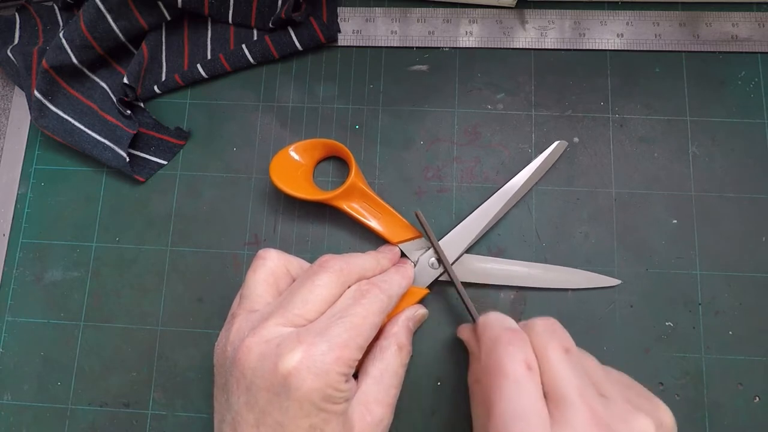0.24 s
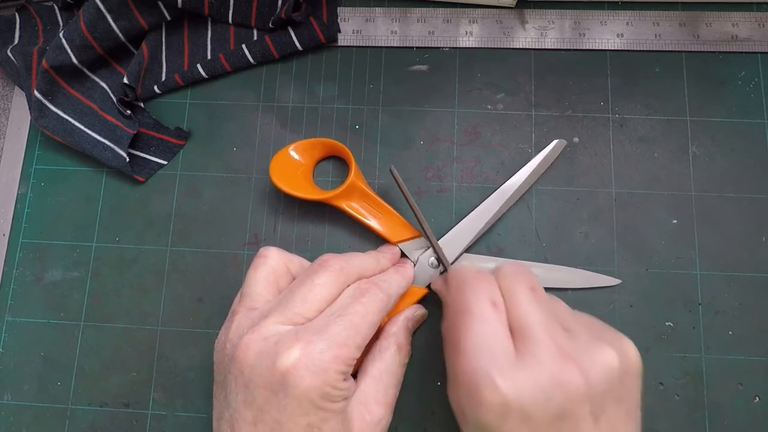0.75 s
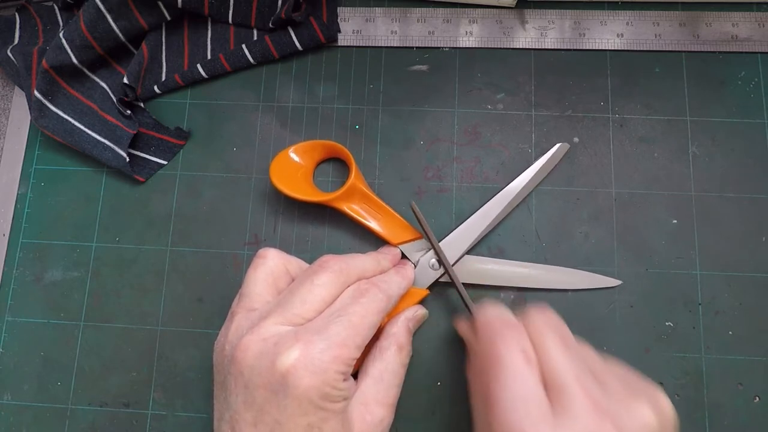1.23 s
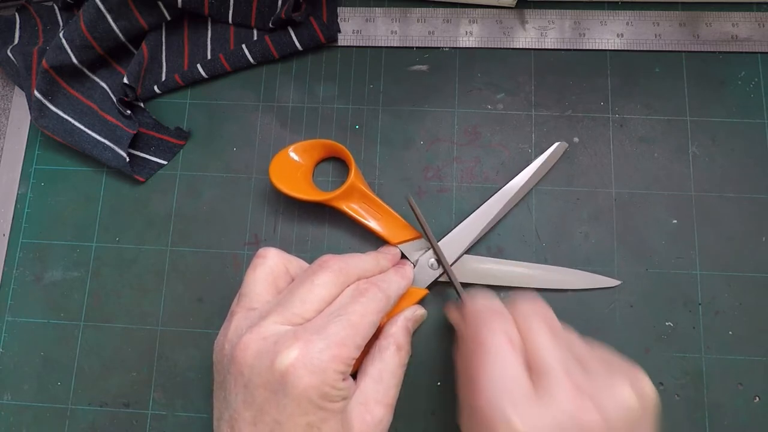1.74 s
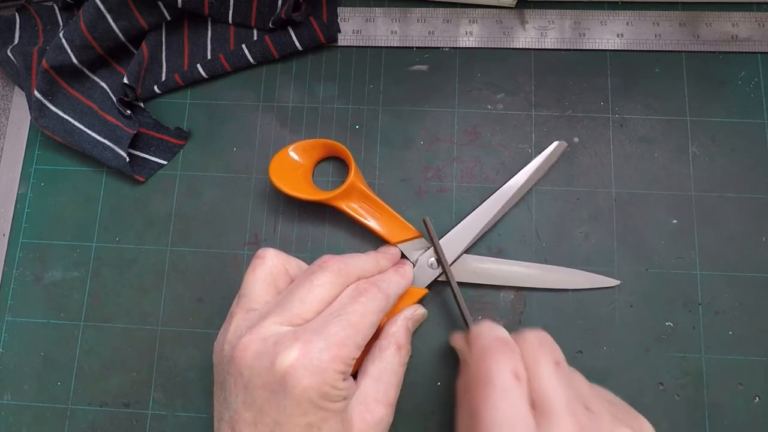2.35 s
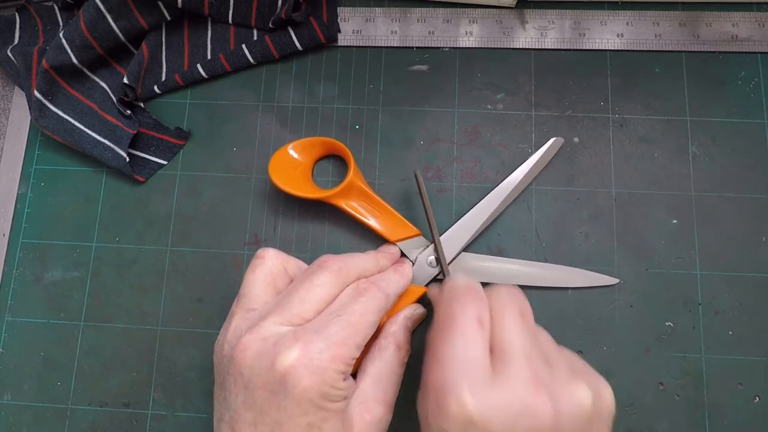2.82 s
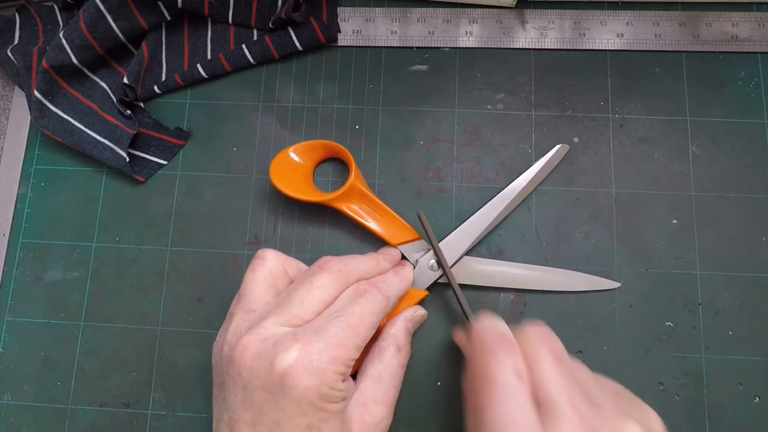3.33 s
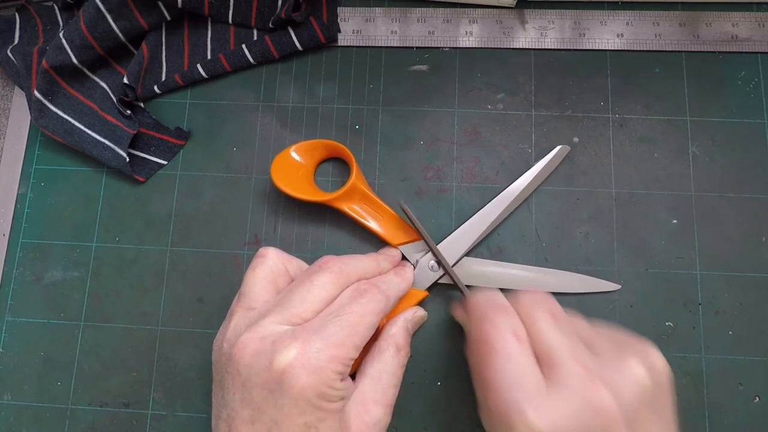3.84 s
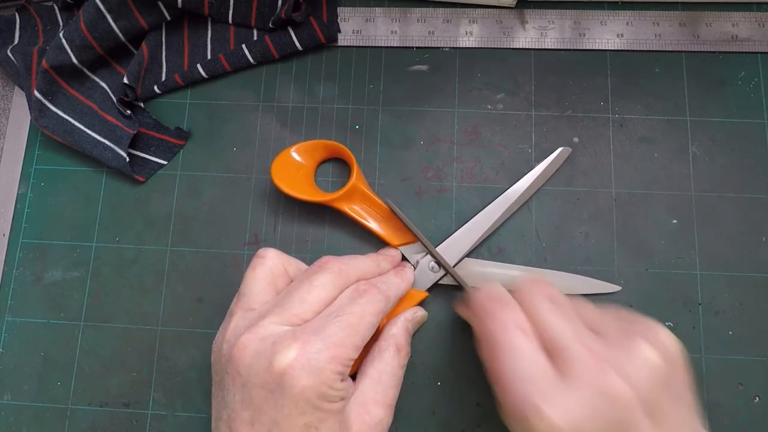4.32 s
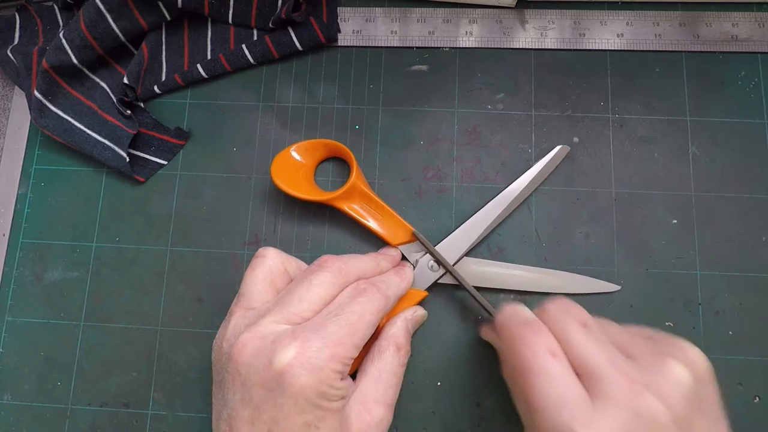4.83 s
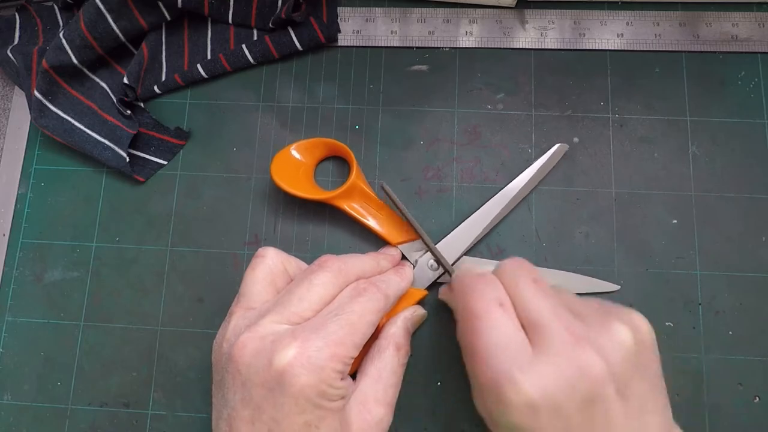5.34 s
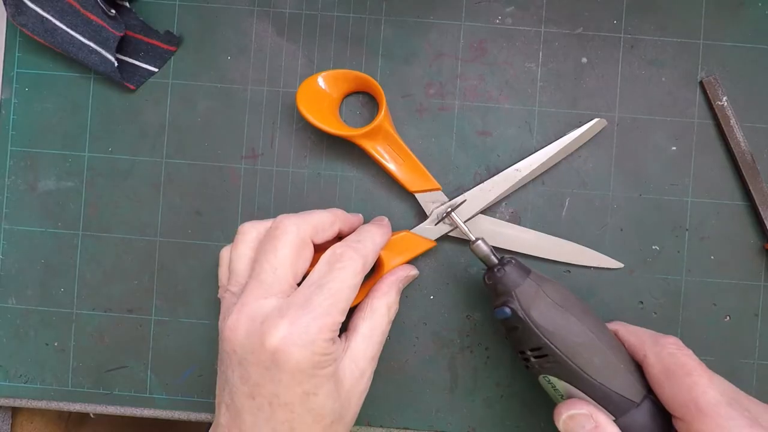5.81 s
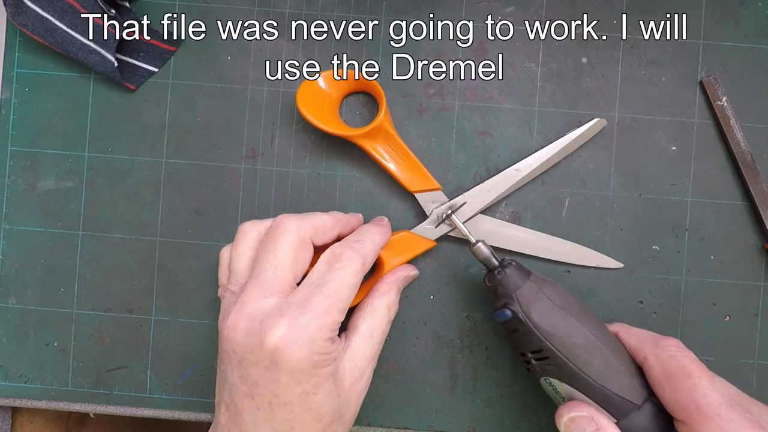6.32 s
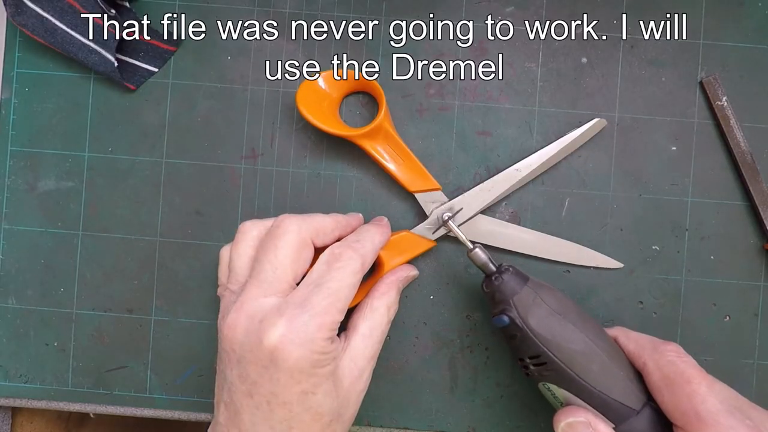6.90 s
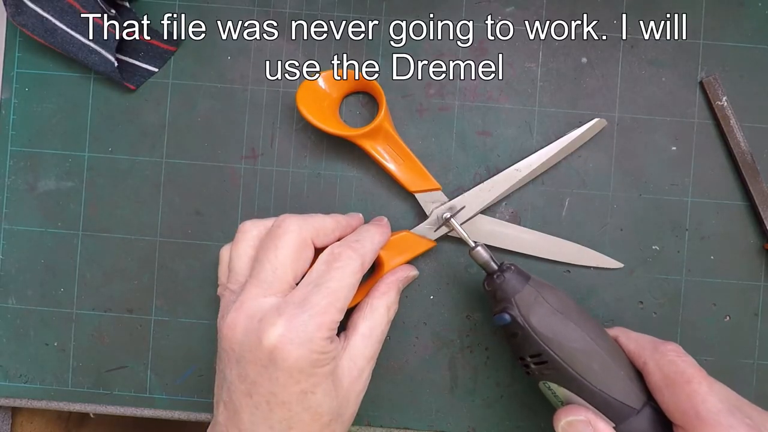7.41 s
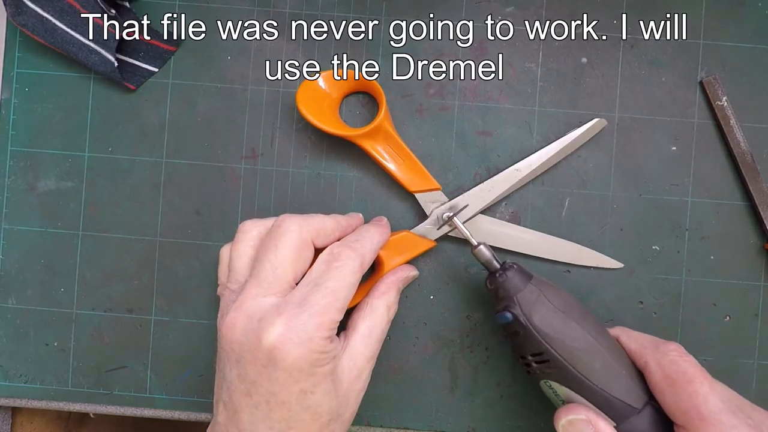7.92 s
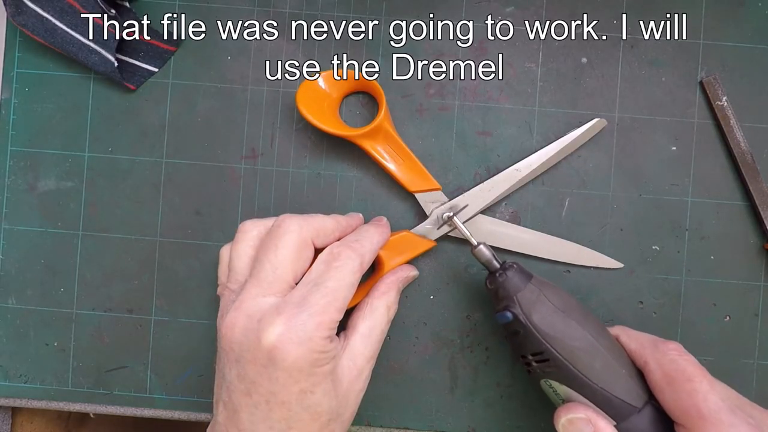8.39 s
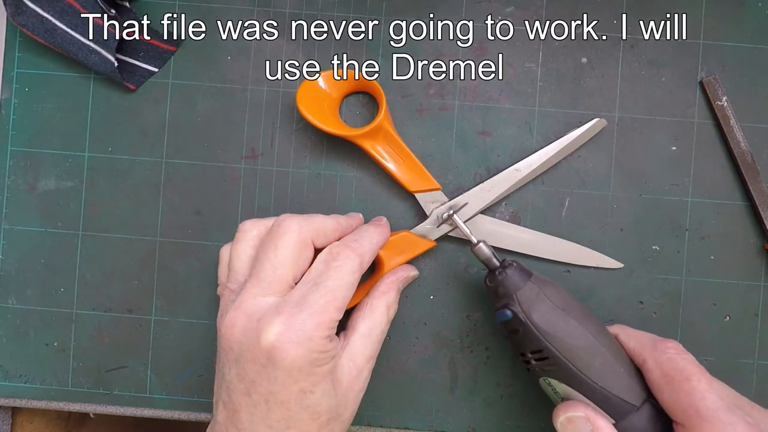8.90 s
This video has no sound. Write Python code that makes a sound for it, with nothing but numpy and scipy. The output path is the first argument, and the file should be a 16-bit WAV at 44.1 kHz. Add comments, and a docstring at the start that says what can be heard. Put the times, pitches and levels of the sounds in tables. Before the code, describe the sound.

Rapid back-and-forth rasping of a file on steel, bright and gritty, each stroke shaking the bench with a dull rumble and occasional clicks. After about five and a half seconds it stops dead and an electric rotary tool is already whirring. The bit bites the metal and grinds continuously, swelling in about four sweeps a second, with brief squeals and a straining motor falling in pitch. Close, wide stereo in a small dry room.

```python
"""Filing and grinding a rivet

A steel rivet in a pair of scissors is worked down on a cutting mat, close to a stereo microphone.
First a hand file rasps in quick strokes: snagging teeth excite the steel's modes and each stroke shakes the bench.
After an abrupt cut and a moment of silence a rotary tool whines under a light touch, then bites into the rivet:
motor tones, fan noise, chatter and squeals all follow one spindle, dragged down in speed as it grinds."""
import sys
import numpy as np
from scipy import signal
from scipy.fft import rfft, irfft, next_fast_len
from scipy.io import wavfile
from scipy.ndimage import uniform_filter1d

SR = 44100
rng = np.random.default_rng(int(sys.argv[2]) if len(sys.argv) > 2 else 0)


def int16_out(signal):
    """Quantize to a 16-bit WAV file."""
    q = np.round(np.clip(np.atleast_2d(signal).T, -1, 1) * 32767)
    wavfile.write(sys.argv[1], SR, q.astype(np.int16))


N = 403496
TIME = np.arange(N) / SR
FILE_ENDS_S, TOOL_BEGINS_S = 5.427, 5.481
MAINS_PULSE_HZ = 100  # half waves of the mains


def from_db(db):
    """Logarithmic level: decibels to amplitude gain."""
    return 10 ** (np.asarray(db) / 20)


def rms_one(x):
    """Normalization: scale to unit power."""
    return x / np.sqrt(np.mean(x ** 2) + 1e-20)


def steady(x):
    """Power levelling: even out the power over 50 ms."""
    return x / np.sqrt(np.abs(uniform_filter1d(x ** 2, SR // 20)) + 1e-20)


def in_time(rows):
    """Linear interpolation: each column of a timed table, sample by sample."""
    s, *columns = np.transpose(rows)
    return [np.interp(TIME, s, column) for column in columns]


def noise():
    """White noise: equal power at all frequencies."""
    return rng.standard_normal(N)


def drift(per_s):
    """Random modulation: a wander of unit rms through per_s random points each second."""
    knots = rng.standard_normal(N // 50)
    return rms_one(np.interp(TIME * per_s, np.arange(len(knots)), knots))


def bump(s, length):
    """Bell-shaped envelope: centred on s and above half its height for the given length."""
    return .5 ** np.minimum((2 * (TIME - s) / length) ** 2, 20)


def colour(x, spectrum):
    """Linear filtering: shape the spectrum by a curve of (f/Hz, gain/dB)."""
    hz, db = np.transpose(spectrum)
    size = next_fast_len(N + SR // 4)
    bins = np.maximum(np.arange(size // 2 + 1) * SR / size, 1)
    gain = from_db(np.interp(np.log(bins), np.log(hz), db))
    return irfft(rfft(x, size) * gain, size)[:N]


def low_part(x, hz):
    """Zero-phase low-pass filtering: what lies below a frequency."""
    return signal.sosfiltfilt(signal.butter(4, hz, fs=SR, output="sos"), x)


def resonate(x, modes, bend=1):
    """Modal synthesis: parallel resonances of alternating sign, all retuned by the factor bend."""
    out = 0
    clock = np.cumsum(bend * np.ones(N)) / SR
    for k, (hz, width, db) in enumerate(modes):
        r = np.exp(-np.pi * width / SR)
        spin = np.exp(2j * np.pi * hz * clock)
        # shift the mode down to 0 Hz, smooth, and shift back
        ringing = (spin * signal.lfilter([1, 1], [1, -r], x * spin.conj())).real
        out = out + (-1) ** k * from_db(db) * (1 - r) * ringing
    return out


def reflections(x, near_t60=0.04, far_t60=0.18, far_db=-8):
    """Reverberation: dense echoes off the bench, then the weaker tail of the workshop; unit power gain."""
    t = TIME[:SR // 3]

    def tail(t60):
        return rms_one(rng.standard_normal(len(t)) * from_db(-60 * t / t60) * (t > .001))

    response = rms_one(tail(near_t60) + from_db(far_db) * tail(far_t60)) / np.sqrt(len(t))
    return signal.fftconvolve(x, response)[:N]


def place(x, width, pan, wet_db, side_db):
    """Mid-side stereo: direct sound with echoes that differ by channel and shift as the hands move."""
    mid = x + from_db(wet_db) * reflections(x)
    hands = drift(12)
    echoes = np.cos(hands) * reflections(x) + np.sin(hands) * reflections(x)
    side = from_db(side_db) * colour(echoes, width)
    left = colour(mid + side, [(hz, db / 2) for hz, db in pan])
    right = colour(mid - side, [(hz, -db / 2) for hz, db in pan])
    return np.array([left, right])


# room tone spectrum: (f/Hz, relative level/dB per Hz)
ROOM_SPECTRUM = [(25, 0), (60, 7), (110, -14), (400, -1), (1500, 2.5), (5000, -20), (9500, -6.5),
                 (11500, -14), (15000, -30)]


def room_tone(level_db=-60):
    """Stationary background: filtered noise."""
    return from_db(level_db) * rms_one(colour(noise(), ROOM_SPECTRUM))


# the teeth catch this quickly, with the hand already this far into its swing
LANDING_S, LANDING_SHARE = 0.008, 0.055
RUN_OUT_S = 0.012  # the file glides on a little after it stops cutting


def stroke(start, length, fastest):
    """Oscillatory motion: speed of the hand through one stroke, 0-1."""
    moments = [start, start + LANDING_S, start + fastest * length, start + length + RUN_OUT_S]
    phase = np.interp(TIME, moments, [0, LANDING_SHARE, .5, 1])
    return np.abs(np.sin(np.pi * phase))


# file strokes, duller and brighter in turn, with one short stray scrape at 2.82 s: (start t/s, length t/s,
# share of the stroke at which the hand is fastest, relative rasp level/dB, relative bench rumble level/dB)
FILE_STROKES = [(-0.011, 0.05, 0.23, -39.5, -34), (0.094, 0.12, 0.48, -38, -36.5),
                (0.262, 0.11, 0.71, -35.5, -35.0), (0.432, 0.12, 0.58, -36.5, -38),
                (0.595, 0.13, 0.76, -37.5, -34.5), (0.77, 0.14, 0.61, -36.5, -40.5),
                (0.951, 0.12, 0.6, -36, -34.5), (1.122, 0.13, 0.62, -36.5, -36.5),
                (1.297, 0.12, 0.66, -36, -36), (1.476, 0.15, 0.24, -37, -37.5),
                (1.667, 0.12, 0.48, -35, -33), (1.831, 0.14, 0.64, -37.0, -37.5),
                (2.007, 0.13, 0.58, -33.5, -33), (2.187, 0.12, 0.63, -33.5, -35),
                (2.348, 0.14, 0.54, -34, -31.5), (2.528, 0.14, 0.49, -35, -37),
                (2.709, 0.12, 0.44, -33, -33.5), (2.823, 0.036, 0.49, -41.5, -36),
                (2.863, 0.13, 0.68, -37.5, -36.5), (3.045, 0.12, 0.59, -34.5, -30.5),
                (3.214, 0.132, 0.58, -35, -35.5), (3.391, 0.13, 0.69, -35.5, -32.5),
                (3.567, 0.136, 0.48, -33.5, -38.5), (3.745, 0.14, 0.58, -35, -32.5),
                (3.925, 0.13, 0.61, -33.5, -38.5), (4.098, 0.13, 0.45, -34, -34),
                (4.275, 0.13, 0.61, -33, -37), (4.448, 0.14, 0.58, -35.5, -36),
                (4.626, 0.14, 0.61, -34, -39), (4.808, 0.15, 0.51, -35.5, -36),
                (5.005, 0.12, 0.51, -35.5, -34), (5.175, 0.14, 0.45, -34.5, -31.5),
                (5.354, 0.084, 0.47, -34, -36)]
# bench top modes: (f/Hz, bandwidth f/Hz, relative level/dB)
BENCH_MODES = [(154.3, 9.1, 2), (194, 25.2, -6.5), (240, 102, -15.5), (296.6, 28, -16), (324.4, 31, -20),
               (429, 40, -27.5), (496, 3.7, -25)]


def bench(rumble_db=-0.5, settle_s=0.012, resting_db=-46):
    """Forced vibration: each stroke shakes the bench top, which settles quickly under the hands."""
    push = sum(from_db(db) * stroke(start, length, fastest)
               for start, length, fastest, _, db in FILE_STROKES)
    r = np.exp(-1 / (settle_s * SR))
    shaking = signal.lfilter([1 - r], [1, -r], push) + from_db(resting_db)
    boom = resonate(noise(), BENCH_MODES, 1 + 0.026 * drift(7.3))
    boom = signal.sosfilt(signal.butter(10, 130, "high", fs=SR, output="sos"), boom)
    return from_db(rumble_db) * shaking * steady(boom)


def snagging_teeth(pace, teeth_per_s_at_half_pace=1100, grain_db=5.5, judder_db=1.22):
    """Impulsive excitation: teeth snag one by one, faster in mid-stroke, amid a steady scraping noise."""
    rate = teeth_per_s_at_half_pace * (.5 + pace) * from_db(drift(150))
    teeth = np.diff(np.floor(np.cumsum(rate) / SR), prepend=0)
    uneven_teeth = rms_one(teeth * from_db(grain_db * noise()))
    snags = rms_one(uneven_teeth + 1.8 * noise())
    return steady(snags * from_db(judder_db * drift(140)))


# file knocking on the rivet: (t/s, relative level/dB)
FILE_KNOCKS = [(0.4393, -22), (1.3324, -19), (1.482, -24), (2.02, -23), (2.1956, -21), (2.3655, -18),
               (2.5325, -26), (2.725, -25), (3.0632, -23), (3.2298, -25), (3.5833, -19), (3.7627, -18),
               (3.934, -22), (4.117, -21), (4.2847, -22), (4.4704, -16), (4.6119, -20), (4.6374, -30),
               (4.826, -24), (5.011, -18.5), (5.0519, -12.5), (5.188, -17), (5.3638, -15)]


def add_knocks(force, knock_db=-10.0, decay_s=0.0013):
    """Impact: add short decaying noise bursts to the force on the steel."""
    burst = np.exp(-np.arange(SR // 40) / SR / decay_s)
    for s, db in FILE_KNOCKS:
        knock = from_db(db + knock_db) * burst * rng.standard_normal(len(burst))
        force[round(s * SR):][:len(burst)] += knock
    return force


# modes of the scissors and file: (f/Hz, bandwidth f/Hz, relative level/dB)
STEEL_MODES = [(517, 8.7, 6), (611.2, 12.5, 13.5), (772, 15.6, 2.5), (918, 48, 11), (1309, 15, 9),
               (1718, 77, 9), (2360, 147, 6.5), (3000, 28, 11.5), (3844, 270, 8.5), (4390, 213, 10),
               (5940, 800, -17), (6260, 200, 14), (7530, 360, 6)]
# scraping spectrum: (f/Hz, relative level/dB per Hz)
RASP_SPECTRUM = [(200, 2.5), (450, 1), (750, -0.5), (1400, 6.5), (3000, 5), (4000, 8), (4800, 6),
                 (6300, 17.5), (7600, -10), (8400, -2.5), (9400, -0.5), (11200, -19), (13000, -23),
                 (15000, -33)]


def ringing_steel(force, ring_db=-1.0, scrape_db=-2.0, shift_db=1.8, grip_bend=.013):
    """Modal response: the force rings the steel, whose pitch shifts with the grip, and scrapes it."""
    bend = 1 + grip_bend * drift(12)
    ring = 0
    for k, mode in enumerate(STEEL_MODES):
        # as the contact travels along the file, each mode is fed more or less
        feed = force * from_db(shift_db * drift(16))
        ring = ring + (-1) ** k * resonate(feed, [mode], bend)
    ring = from_db(ring_db) * rms_one(low_part(ring, 8200))
    scrape = from_db(scrape_db) * rms_one(colour(force, RASP_SPECTRUM))
    return np.std(force) * (ring + scrape)


# file squeaking as it turns round: (t/s, length t/s, f/Hz, relative level/dB)
FILE_SQUEAKS = [(1.121, 0.03, 4450, -50), (1.294, 0.017, 4650, -50)]


def squeaks(width_hz=190):
    """Narrow-band resonance: noise through one mode gives each short squeak."""
    out = np.zeros(N)
    for s, length, hz, db in FILE_SQUEAKS:
        out += from_db(db) * bump(s, length) * rms_one(resonate(noise(), [(hz, width_hz, 0)]))
    return out


ALTERNATE_BRIGHTER_DB = 0.5  # treble against middle range, every second row compared with the others
TREBLE_RISE_DB_PER_S = 1  # the highest treble grows as the work goes on


def hand_file(resting_scrape_db=-55.5):
    """Source-filter principle: teeth snag faster and harder in mid-stroke and ring the steel."""
    pace, rasp, keen_db = np.zeros((3, N))
    for k, (start, length, fastest, rasp_db, _) in enumerate(FILE_STROKES):
        swing = stroke(start, length, fastest)
        pace += swing
        rasp += from_db(rasp_db) * swing ** 1.02
        keen_db += swing * ALTERNATE_BRIGHTER_DB * (k % 2 - .5)
    # a faint steady scrape goes on under and between the strokes
    force = snagging_teeth(pace) * (rasp + from_db(resting_scrape_db))
    steel = ringing_steel(add_knocks(force)) + squeaks()
    body = low_part(steel, 10500)
    steel = body + (steel - body) * from_db(TREBLE_RISE_DB_PER_S * TIME)
    # brighter strokes move the weight from the middle range to the treble
    dull = low_part(steel, 1700)
    return dull * from_db(-keen_db / 2) + (steel - dull) * from_db(keen_db / 2)


# cooling air spectrum: (f/Hz, relative level/dB per Hz)
FAN_SPECTRUM = [(15, -40), (25, -56), (191, -8), (362, -18), (560, -22.5), (829, -5), (1150, -11.5),
                (1750, -1), (1950, -3), (2290, -2), (2840, -5), (3400, -2.5), (4700, -5.5), (6490, -2),
                (7420, -20), (10500, -19.5), (14900, -99)]


def fan_air(speed, full_speed_db=-31, speed_power=1.1):
    """Turbulent flow noise: the fan blows less as the spindle slows."""
    blowing = from_db(full_speed_db) * (speed / speed.max()) ** speed_power
    return blowing * rms_one(colour(noise(), FAN_SPECTRUM))


# low sounds: (t/s, shaft imbalance level/dB, draught on the microphone level/dB)
LOW_SOUNDS = [(5.48, -82, -49), (6.0, -67, -49), (6.35, -44.5, -49), (7.0, -51, -55), (8.0, -43.5, -76),
              (9.15, -49, -95)]
# draught spectrum: (f/Hz, relative level/dB per Hz)
DRAUGHT_SPECTRUM = [(10, -2), (28, 7), (65, -10), (150, 1.5), (400, -15.5), (2000, -63)]


def draught():
    """Wind noise: low-frequency turbulence of the draught on the microphone."""
    _, draught_db = in_time(LOW_SOUNDS)
    return from_db(draught_db) * rms_one(colour(noise(), DRAUGHT_SPECTRUM))


def shaft(angle, second_db=-62):
    """Rotating imbalance: fluctuating tones at once and twice the spindle speed."""
    shaft_db, _ = in_time(LOW_SOUNDS)
    first = from_db(shaft_db + 4.8 * drift(27)) * np.sin(angle)
    second = from_db(second_db + 2 * drift(12)) * np.sin(2 * angle)
    return first + second


def mains_hum(mains, strain, hum_db=-48, buzz_db=-55, third_db=-60.0):
    """Harmonics of the mains pulse: the first fades and the second grows under strain."""
    first = from_db(buzz_db) * (1 - strain) * np.sin(mains)
    second = from_db(hum_db) * (0.49 + 1.36 * strain) * np.sin(2 * mains)
    third = from_db(third_db) * np.sin(3 * mains)
    return first + second + third


# the hand sweeps the bit to and fro over the rivet: (lightest touch t/s, swell of the scream level/dB,
# swell of the hiss level/dB, swell of the motor's eighth order level/dB)
BIT_SWEEPS = [(5.75, -0.5, 3.5, 0), (6.17, 3.5, 1.5, 0), (6.38, 1.5, 0, 8), (6.67, 4, 2, -1),
              (6.93, 3.5, 3.5, -8), (7.21, 1.5, 3.5, -25), (7.45, 2.5, 1, 1), (7.73, 3.5, 3.5, -2),
              (7.91, 2.5, 2, 1.5), (8.16, 3, 3, 0.5), (8.38, 4, 2, 1.5), (8.62, 2.5, 1.5, 1.5),
              (8.86, 3.5, 3.5, 1.5), (9.11, 7, 2, -5), (9.35, 3, 1, 10)]
# when each sound swells after the lightest touch (share of a sweep)
HISS_LAG, SCREAM_LAG, SQUEAL_LAG, TONE_LAG = 0.11, 0.3, -0.45, -0.14


def swell(lag, heights=1):
    """Periodic modulation: one smooth rise from zero per sweep, peaking lag after the lightest touch."""
    number = np.arange(len(BIT_SWEEPS))
    sweep = np.interp(TIME, np.array(BIT_SWEEPS)[:, 0], number) - lag
    height = np.interp(sweep, number, heights * np.ones(len(number)))
    return height * np.cos(np.pi * sweep) ** 2


# armature slot tones: (multiple of the spindle speed, relative level/dB, phase wobble/rad)
SLOT_TONES = [(8, 5.5, 2.7), (16, -4, 3.7), (24, -6, 5.3), (12, -10, 0.54), (20, -26, 3.4)]
# motor housing response: (f/Hz, relative level/dB)
HOUSING_RESPONSE = [(1500, -7.5), (1900, 7.5), (2020, 14), (2170, 9.5), (2320, 15.5), (2440, -38),
                    (3200, 11.5), (6400, 13)]


def slot_whine(angle, mains, strain, whine_db, surge=1.05):
    """Amplitude and phase modulation: mains pulses split slot tones into clusters 100 Hz apart."""
    current = np.exp(surge * np.cos(mains))
    # the speed wobble lags the current by a quarter cycle
    tones = sum(from_db(db) * np.sin(round(k) * angle - sway * np.cos(mains))
                for k, db, sway in SLOT_TONES)
    whine = rms_one(colour(current * tones, HOUSING_RESPONSE))
    throb = 1 + strain * (swell(TONE_LAG) - .5)
    return from_db(whine_db) * throb * whine


def labouring_tones(angle, mains, fourth_db=-37.0, eighth_db=-25.0, eighth_rest=0.084, waver_db=4.0):
    """Order tones: the fourth wavers and the eighth throbs with each sweep."""
    fourth = from_db(fourth_db + waver_db * drift(25)) * np.sin(4 * angle - 0.12 * np.cos(mains))
    throb = eighth_rest + swell(TONE_LAG, from_db(np.array(BIT_SWEEPS)[:, 3]))
    eighth = from_db(eighth_db) * throb * np.sin(8 * angle)
    return fourth + eighth


def motor(turns, strain, whine_db):
    """Electromagnetic excitation: each half wave of the mains jerks the turning armature."""
    mains = 2 * np.pi * MAINS_PULSE_HZ * TIME
    angle = 2 * np.pi * turns
    whine = slot_whine(angle, mains, strain, whine_db)
    # the fourth and eighth orders come forward as the motor labours
    labouring = strain * labouring_tones(angle, mains)
    # near full speed the third order meets a resonance of the housing
    third = resonate(np.sin(3 * angle + 0.24 * drift(90)), [(775, 21, -49.5)])
    tones = labouring + third + shaft(angle) + mains_hum(mains, strain)
    return whine + np.sqrt(2) * tones + draught()


# brief squeals of the bit: (t/s, length t/s, multiple of the spindle speed, relative level/dB)
BIT_SQUEALS = [(6.05, 0.3, 24, -31), (6.21, 0.13, 15, -30), (6.22, 0.13, 14, -29), (6.39, 0.14, 26, -28),
               (6.42, 0.2, 16, -23.5), (6.44, 0.17, 14, -21), (6.44, 0.15, 24, -25.5), (6.64, 0.1, 15, -27),
               (6.65, 0.06, 28, -26), (6.75, 0.07, 17, -26), (6.76, 0.11, 16, -23), (6.84, 0.07, 9, -26),
               (6.99, 0.07, 15, -28), (7.02, 0.08, 17, -28), (7.24, 0.1, 26, -26), (7.34, 0.08, 10, -27),
               (7.42, 0.08, 16, -27), (7.43, 0.05, 30, -26), (7.54, 0.08, 17, -24), (7.62, 0.07, 10, -27),
               (7.66, 0.06, 17, -26), (7.76, 0.05, 17, -23), (7.78, 0.08, 25, -26), (8.0, 0.07, 20, -27),
               (8.01, 0.06, 10, -24), (8.28, 0.12, 20, -28), (8.28, 0.09, 21, -27), (8.48, 0.08, 21, -25),
               (8.67, 0.05, 30, -24), (8.76, 0.06, 19, -27), (9.06, 0.05, 19, -26)]


def squeals(turns, level_db=-0.5, wobble_rad=0.4):
    """Mode locking: now and then the bit locks onto one multiple of its speed and sings out."""
    sway = wobble_rad * drift(70)
    out = np.zeros(N)
    for s, length, k, db in BIT_SQUEALS:
        phase = 2 * np.pi * (round(k) * turns + rng.random()) + sway
        out += from_db(db + level_db) * bump(s, length) * np.sin(phase)
    return np.sqrt(2) * out


def chatter(turns, bounce, swaps_per_s=21, scatter_per_s=100, rough_multiple=54, half_db=-11):
    """Harmonic series: multiples of the speed and weaker halfway partials, each coming and going by itself."""
    on = TIME > TOOL_BEGINS_S
    t, half_turn = TIME[on], np.exp(1j * np.pi * turns[on])
    # the halfway partials strengthen with the bounce on every second turn
    between = from_db(half_db) + .5 * bounce[on]
    out, partial = np.zeros(N), np.ones(len(t), complex)
    knots = np.arange(N // 400)
    for k in range(1, 140):
        partial = partial * half_turn
        slow, fast = rng.standard_normal((2, len(knots))) + 1j * rng.standard_normal((2, len(knots)))
        # higher partials are rougher
        rough = min(k / 2 / rough_multiple, 1)
        slow_change = np.interp(t * swaps_per_s, knots, slow)
        fast_change = np.interp(t * scatter_per_s, knots, fast)
        strength = np.sqrt(1 - rough ** 2) * slow_change + rough * fast_change
        out[-len(t):] += (strength * partial).real * (between if k % 2 else 1)
    return out


def tearing_grit(turns, droop, skimming_db=1, digging_db=-10, bite=0.5):
    """Modulated noise: grit tears once per turn, weaker as the bit slows."""
    grit = rms_one(noise() * np.exp(bite * np.cos(2 * np.pi * turns) + 0.14 * drift(400)))
    return grit * from_db(np.interp(droop, [0, 1], [skimming_db, digging_db]))


# modes of the scissors under the bit: (f/Hz, bandwidth f/Hz, relative level/dB)
BLADE_MODES = [(2593, 52, 2), (3584, 170, -4), (3880, 200, -11.5), (5146, 170, -11), (5766, 120, -2),
               (6510, 77, -3.5), (7586, 120, -0.5), (8580, 136, 2.5), (10330, 120, 5)]


def blade_ringing(x, flicker_db=3.5):
    """Modal response: the blades ring at fixed pitches, each fed more or less as the bit moves."""
    return x + sum(resonate(x * from_db(flicker_db * drift(14)), [mode]) for mode in BLADE_MODES)


# cutting spectrum: (f/Hz, relative gain/dB)
CUTTING_SPECTRUM = [(250, -33), (550, -30), (1000, -38), (1250, -19.5), (1450, -6), (1620, 0), (2100, -1.5),
                    (2550, -6.5), (3000, -11.5), (3400, -2), (4050, -4.5), (4650, -13), (5150, -1),
                    (5900, -1), (7100, -3), (8200, -10.5), (9500, -18), (11000, -32.5), (13300, -22),
                    (15000, -58)]
# the bit screams as it first bites into the rivet; the extra level dies away with this time constant
BITE_S, BITE_DECAY_S, BITE_DB = 5.838, 0.06, 6


def grinder(turns, bounce, pressure, droop, hiss_db=-24, scream_db=-25.0, squeal_db=-28.5,
            squeal_swell_db=3.5, squeal_at_speed=0.95):
    """Band-wise modulation: chatter and grit sound in three zones of the steel that swell in turn."""
    surge = 1 + 0.1 * np.cos(2 * np.pi * MAINS_PULSE_HZ * TIME)
    contact = surge * (steady(chatter(turns, bounce)) + tearing_grit(turns, droop))
    cutting = blade_ringing(colour(contact, CUTTING_SPECTRUM))
    # the grinding is duller above 7 kHz at low pressure, fuller as pressure rises
    cutting = pressure * cutting + (1 - pressure) * low_part(cutting, 7200)
    low, low_and_middle = low_part(cutting, 2800), low_part(cutting, 4600)
    _, scream_swell_db, hiss_swell_db, _ = np.transpose(BIT_SWEEPS)
    # the low squeal grows as the bit slows and bounces
    digging = np.interp(droop, [0, 1], [squeal_at_speed, 1]) * (0.48 + 1.6 * bounce)
    squeal = from_db(squeal_db + swell(SQUEAL_LAG, squeal_swell_db)) * digging * steady(low)
    first_bite_db = BITE_DB * (TIME > BITE_S) * np.exp(-np.abs(TIME - BITE_S) / BITE_DECAY_S)
    scream_gain = from_db(scream_db + swell(SCREAM_LAG, scream_swell_db) + first_bite_db)
    scream = scream_gain * steady(low_and_middle - low)
    hiss = from_db(hiss_db + swell(HISS_LAG, hiss_swell_db)) * steady(cutting - low_and_middle)
    return pressure * (squeal + scream + hiss)


# spindle speed, sinking under the load and tugged by each sweep: (t/s, rotation f/Hz)
SPINDLE_SPEED = [(5.83, 264.5), (5.94, 262.0), (6.15, 260.2), (6.28, 252.6), (6.4, 248.7), (6.55, 236.3),
                 (6.66, 232.2), (6.8, 220.5), (6.93, 221.2), (7.08, 214.9), (7.21, 220.6), (7.34, 215.5),
                 (7.44, 217.5), (7.6, 208.0), (7.71, 210.9), (7.81, 204.5), (7.9, 207.3), (8.05, 198.3),
                 (8.15, 201.0), (8.28, 191.9), (8.39, 196.6), (8.5, 189.4), (8.62, 196.1), (8.75, 187.0),
                 (8.86, 192.8), (8.98, 182.8), (9.12, 185.8)]
# load: (t/s, pressure on the rivet 0-1, slot whine level/dB, bounce on every second turn 0-1)
BIT_LOAD = [(5.48, 0.11, -25.5, 0.1), (5.66, 0.13, -24.5, 0.6), (5.834, 0.43, -24.5, 0.2),
            (5.84, 0.66, -28, 0.61), (6.01, 0.6, -23, 0.06), (6.3, 0.89, -25, 0.15), (6.55, 1, -29, 0.19),
            (6.9, 0.96, -33, 0.22), (7.8, 0.95, -27, 0.33), (9.15, 0.9, -23.5, 0.28)]
# loss of speed at which the motor labours fully, and how steeply the strain builds up to it
FULL_STRAIN_DROP_HZ, STRAIN_POWER = 58, 2.6


def rotary_tool():
    """Common rotation: motor, cooling air and grinding bit all follow one spindle."""
    speed = uniform_filter1d(in_time(SPINDLE_SPEED)[0], SR // 25)
    pressure, whine_db, bounce = in_time(BIT_LOAD)
    droop = np.clip((speed.max() - speed) / FULL_STRAIN_DROP_HZ, 0, 1)
    turns = np.cumsum(speed * (1 + 0.00081 * pressure * drift(60))) / SR
    machine = motor(turns, droop ** STRAIN_POWER, whine_db) + fan_air(speed)
    return machine + grinder(turns, bounce, pressure, droop) + squeals(turns)


# stereo width: (f/Hz, side to mid level/dB)
FILE_SIDE = [(60, -20), (130, -8.5), (290, -5), (630, 1.5), (1380, 0), (3010, -13), (6590, -6), (14400, 4)]
TOOL_SIDE = [(60, -13), (110, -7), (200, -16.5), (370, 0.5), (690, -3), (1260, 5), (2320, -7), (4260, -13),
             (7840, 2), (14400, -3.5)]
# stereo balance: (f/Hz, left to right level/dB)
FILE_BALANCE = [(60, 0.0), (150, -0.1), (370, 1.5), (930, -1.5), (2320, 0.2), (5780, 0.53), (14400, 1)]
TOOL_BALANCE = [(60, -13), (120, 9), (240, -4), (470, 2.5), (930, -4.5), (1850, -1.5), (3660, -1.5),
                (7270, 1.5), (14400, 1.5)]


def scene(wet_db=-13, side_db=0.5):
    """Superposition in two passages: filing, a moment of silence, then grinding."""
    filing = place(room_tone() + bench() + hand_file(), FILE_SIDE, FILE_BALANCE, wet_db, side_db)
    grinding = place(rotary_tool(), TOOL_SIDE, TOOL_BALANCE, wet_db, side_db)
    return filing * (TIME < FILE_ENDS_S) + grinding * (TIME > TOOL_BEGINS_S)


def record(dry, ceiling=0.49, cutoff_hz=15000):
    """Saturation and band limiting: the highest peaks are rounded and the top is cut steeply."""
    rounded = dry / (1 + (dry / ceiling) ** 6) ** (1 / 6)
    return signal.sosfilt(signal.ellip(10, .1, 80, cutoff_hz, fs=SR, output="sos"), rounded)


dry = scene()
out = record(dry)
int16_out(out)
```